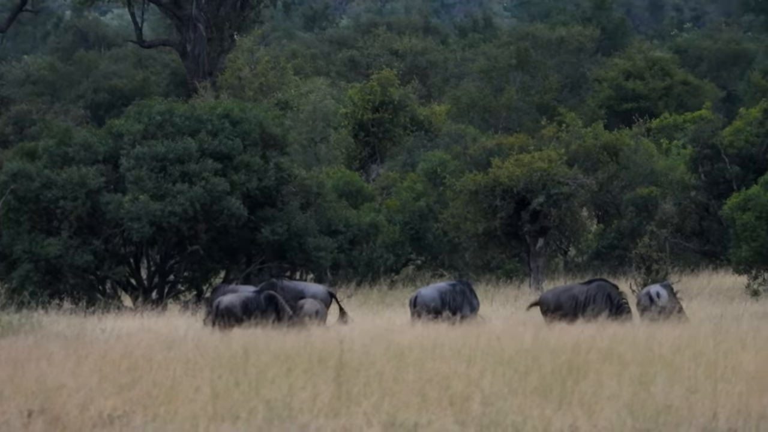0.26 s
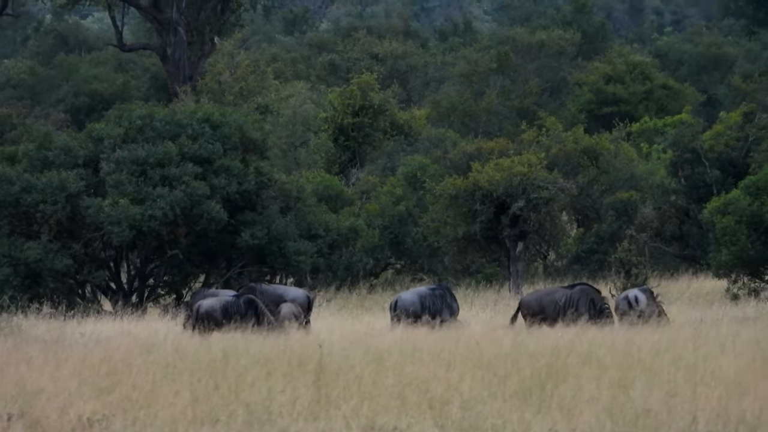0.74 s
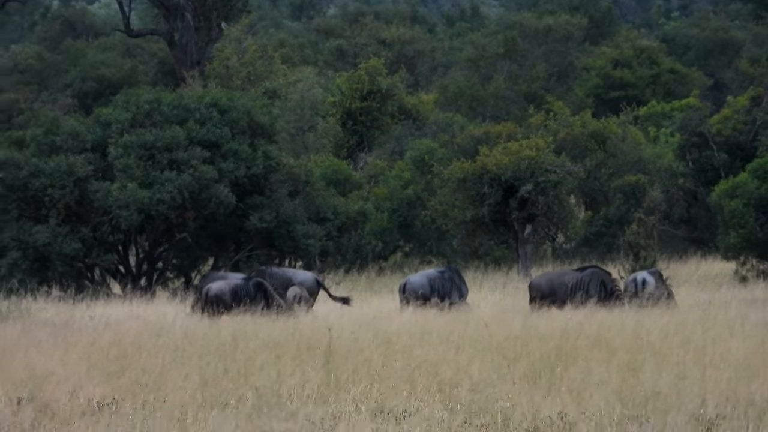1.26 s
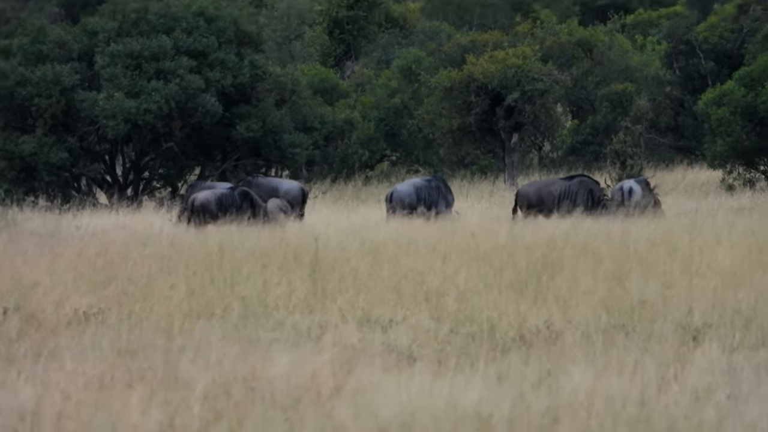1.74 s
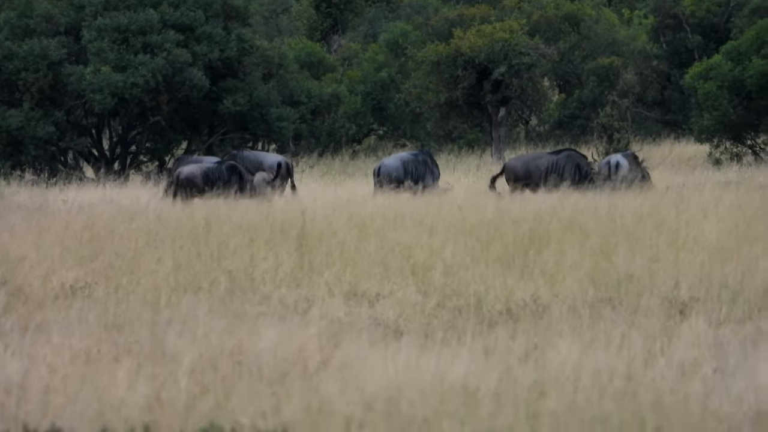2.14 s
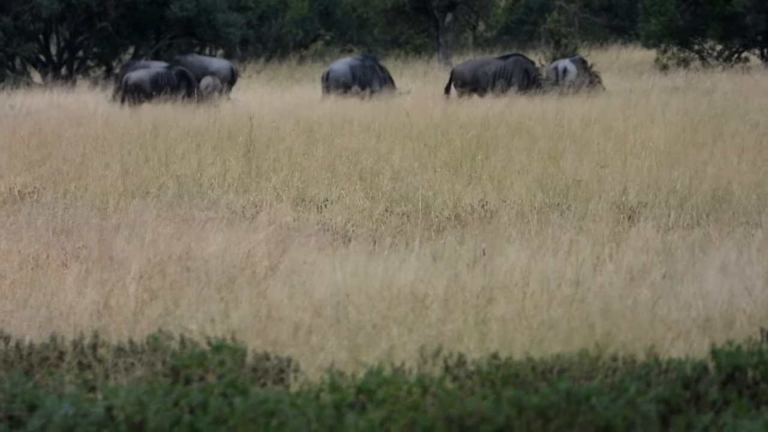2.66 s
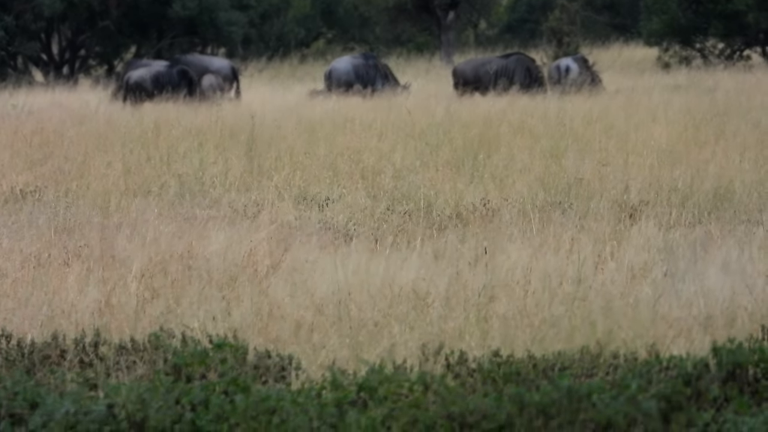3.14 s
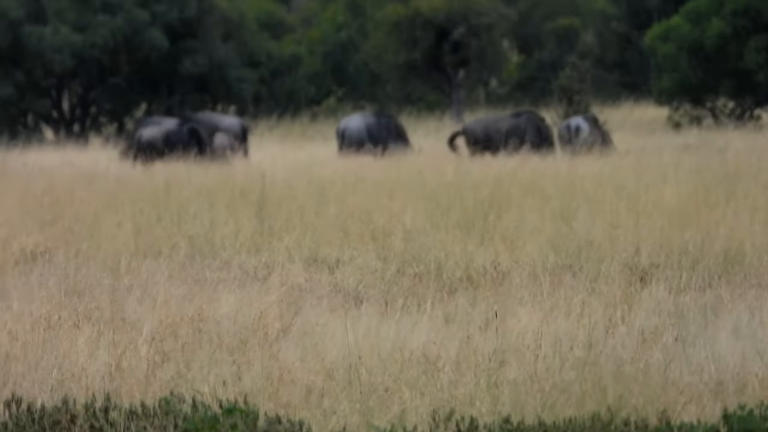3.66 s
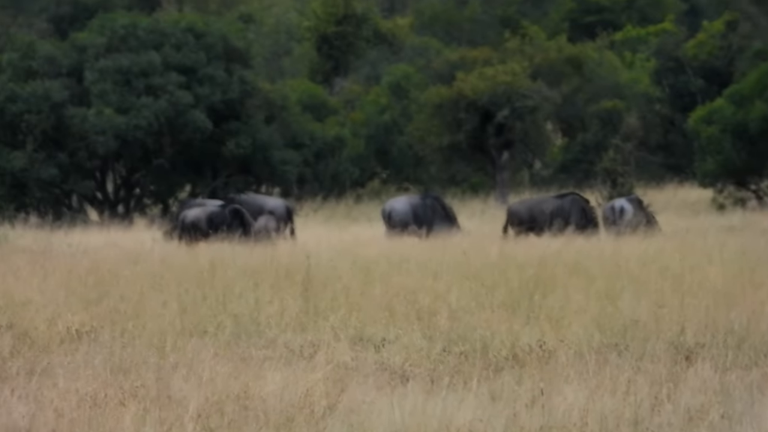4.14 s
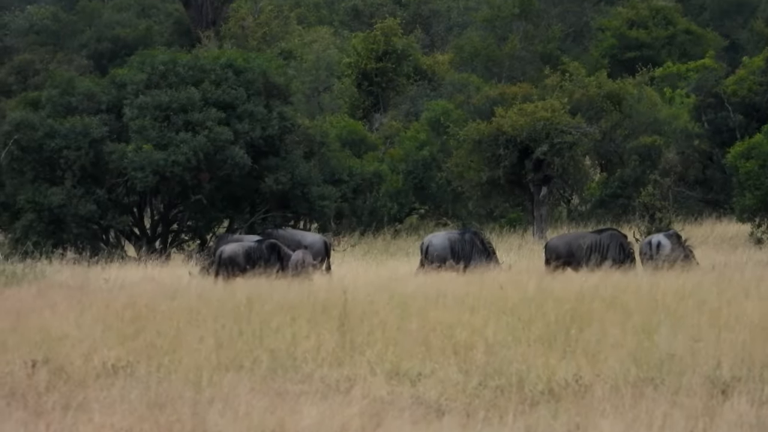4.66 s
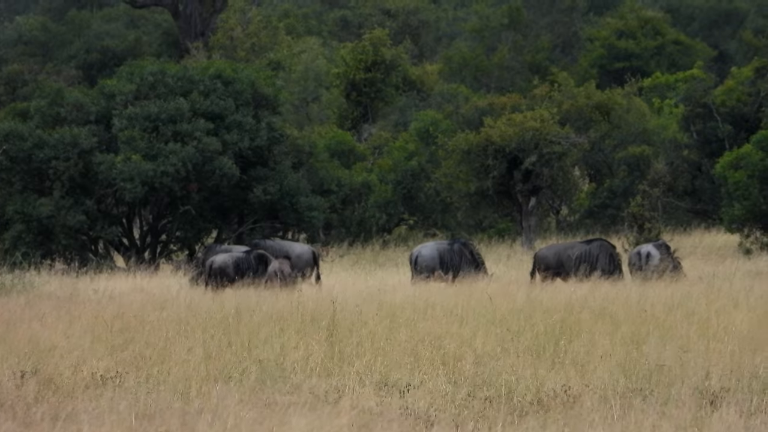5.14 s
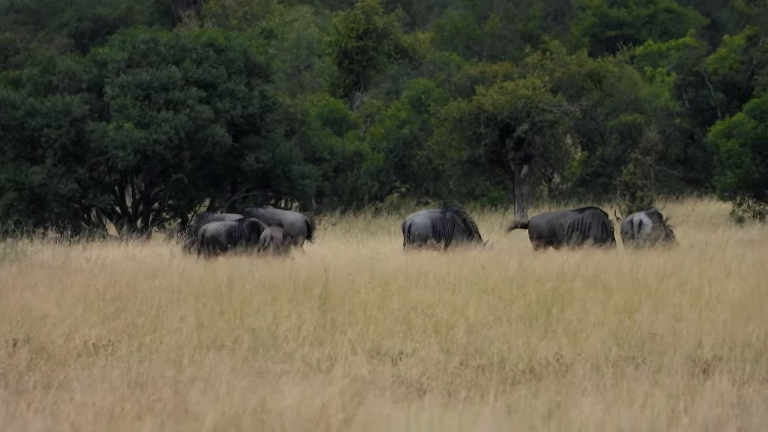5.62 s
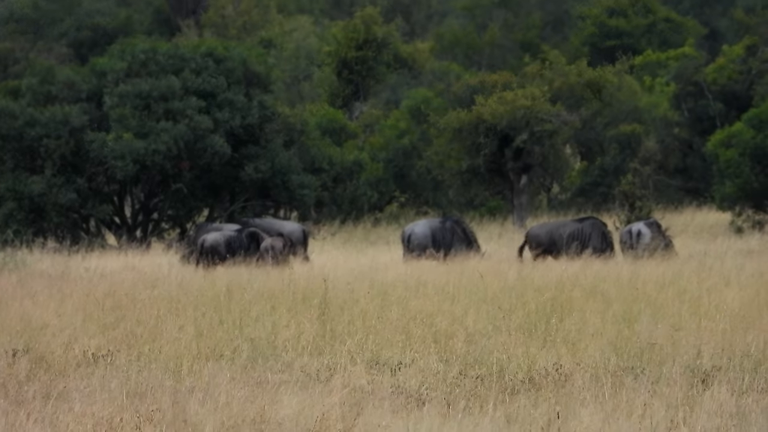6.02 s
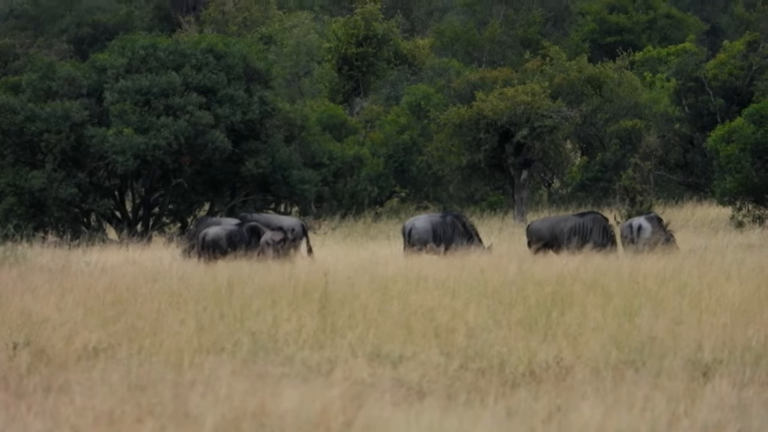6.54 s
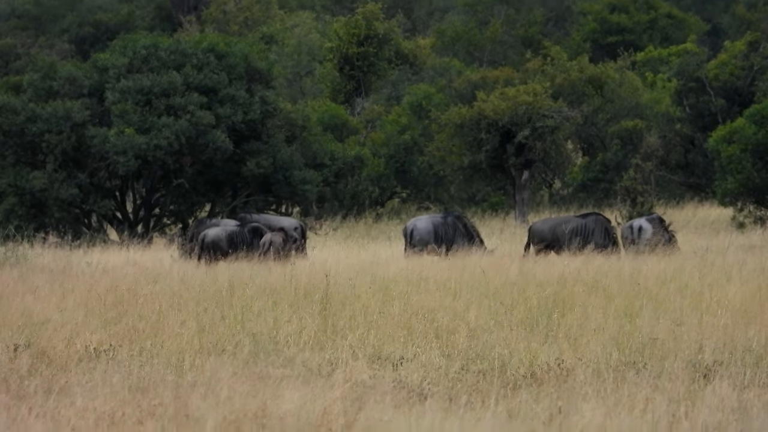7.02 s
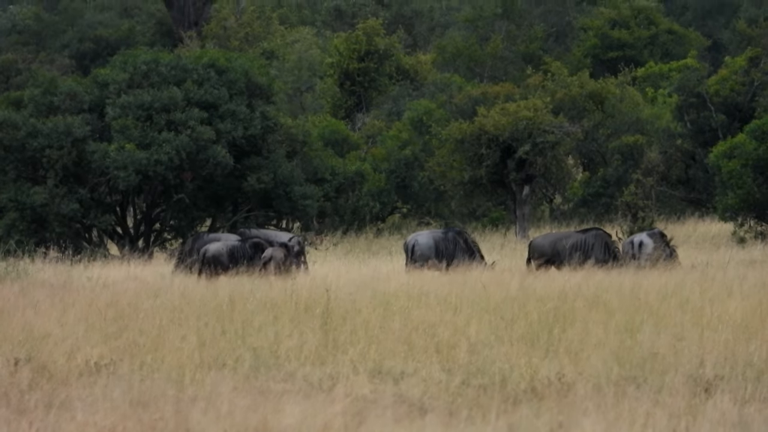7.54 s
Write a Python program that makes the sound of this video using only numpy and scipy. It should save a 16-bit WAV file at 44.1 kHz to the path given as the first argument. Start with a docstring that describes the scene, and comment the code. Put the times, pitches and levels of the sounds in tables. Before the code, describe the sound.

A spurfowl-like bird builds from soft yelps to harsh, repeated crows while a second screeches along, over small bird trills and a low distant engine hum.

```python
"""Savanna dawn chorus

A spurfowl works up from soft yelps to a harsh, repeated crow; a second screeches along, and others
answer from far off. Throat resonances shape pulses into honks and rasps; clear notes are gliding sines.
Small birds trill and chip in the bush, which scatters the calls; the tree line returns one echo.
A distant engine hums, the camera body is knocked, and a gain control ducks everything under loud crows."""
import sys
import numpy as np
from scipy import signal
from scipy.fft import rfft, irfft, next_fast_len
from scipy.io import wavfile
from scipy.ndimage import uniform_filter1d

SR = 44100
rng = np.random.default_rng(int(sys.argv[2]) if len(sys.argv) > 2 else 0)


def generate_wav(signal):
    """Clip the signal to [-1, 1] and save it as 16-bit WAV at the path in sys.argv[1]."""
    frames = np.transpose(np.atleast_2d(signal))
    scaled = np.clip(frames, -1, 1) * 32767
    pcm = np.round(scaled).astype(np.int16)
    wavfile.write(sys.argv[1], SR, pcm)


N = 343539
TIME = np.arange(N) / SR
EDGE_HZ = 15750  # upper band limit


def gain_of(db):
    """Decibels to gain."""
    return 10 ** (np.asarray(db) / 20)


def evened(x):
    """Scales to an rms of 1."""
    return x / np.sqrt(np.mean(x ** 2) + 1e-20)


def read(points, hz):
    """Joins (Hz, value) points on a log-frequency axis."""
    f, value = np.transpose(points)
    return np.interp(np.log(hz + 1), np.log(f + 1), value)


def coloured(x, points):
    """Filters by a (Hz, dB) spectrum."""
    size = next_fast_len(len(x) + 512)
    gain = gain_of(read(points, np.fft.rfftfreq(size, 1 / SR)))
    return irfft(rfft(x, size) * gain, size)[:len(x)]


def wander(rate_hz):
    """A random drift of rms 1 over the whole scene, joining rate_hz new values a second by straight lines."""
    knots = rng.standard_normal(N // 16)
    return evened(np.interp(TIME * rate_hz, np.arange(len(knots)), knots))


def resonate(x, hz, width_hz):
    """A resonance of gain 1 that follows the curve hz."""
    turn = np.exp(2j * np.pi * np.cumsum(hz) / SR)
    r = np.exp(-np.pi * width_hz / SR)
    return 2 * (turn * signal.lfilter([1 - r], [1, -r], x / turn)).real


def note(s, length, edge_s):
    """A note's samples, its progress from 0 to 1, and its soft-edged envelope."""
    # half of the edge time is added, a quarter on each side
    first = max(round((s - edge_s / 4) * SR), 0)
    last = min(round((s + length + edge_s / 4) * SR), N)
    at = np.arange(first, last)
    return at, np.linspace(0, 1, len(at)), signal.windows.tukey(len(at), min(2 * edge_s / length, 1))


def glide(s, length, first_hz, last_hz, db, overtones_db, arch=0):
    """A clear note whose middle pitch is raised by the share arch."""
    middle_hz = (first_hz + last_hz) / 2 * (1 + arch)
    return s, length, first_hz, middle_hz, last_hz, db, overtones_db


# resonances of the spurfowl's throat and open beak: (frequency [Hz], relative level [dB])
THROAT_SPECTRUM = [(700, -42), (1200, -47), (1550, -18.5), (2300, -0.5), (3050, -9.5), (3800, -15),
                   (4600, -19.5), (5350, -15.5), (6100, -21.5), (7000, -38), (10000, -37), (15000, -47)]


def overtones(turns, hz, tilt_db=0):
    """Harmonics above the fundamental, shaped by the throat; tilt_db an octave favours those near 3.7 kHz."""
    k = np.arange(2, 17)[:, None]
    db = read(THROAT_SPECTRUM, k * hz) - tilt_db * abs(np.log2(k * hz / 3700))
    lines = np.cos(2 * np.pi * (k * turns + rng.random(k.shape)))
    return evened((gain_of(db) * (k * hz < EDGE_HZ) * lines).sum(0))


def whistles(notes, flutter_db=1.9, edge_s=0.00899, arch_db=5):
    """Near-sine notes that swell and fade as they glide, with faint overtones."""
    waver = .007
    out, drift, flutter = np.zeros(N), wander(500), wander(300)
    for s, length, first_hz, middle_hz, last_hz, db, overtones_db in notes:
        at, u, envelope = note(s, length, edge_s)
        bow = np.polyfit([0, .5, 1], [first_hz, middle_hz, last_hz], 2)
        hz = np.polyval(bow, u) * (1 + waver * drift[at])
        turns = np.cumsum(hz) / SR
        tone = np.sqrt(2) * np.sin(2 * np.pi * turns) + gain_of(overtones_db) * overtones(turns, hz)
        swell_db = arch_db * (1 / 3 - (2 * u - 1) ** 2) + flutter_db * flutter[at]
        out[at] += gain_of(db + swell_db) * envelope * tone
    return out


# source spectrum of the noise and chaotic pulses: (frequency [Hz], relative level [dB])
RASP_SPECTRUM = [(400, -34), (1000, -5), (1800, -0.5), (2700, 4.5), (3800, 9.5), (4600, -1.5), (5700, -2),
                 (7100, -22), (9500, -44), (15000, -37)]


def honks(notes, waver=0.0063, rasp_db=-19, edge_s=.007, bend=0.037, bend_s=0.0051, level_db=-1.0):
    """Regular pulses ring the throat: a stack of lines over a little rasp.

    Notes above 1 kHz slide down into pitch, lower ones up."""
    out, drift = np.zeros(N), wander(600)
    rasp = evened(coloured(rng.standard_normal(N), RASP_SPECTRUM))
    for s, length, first_hz, last_hz, db, tilt_db in notes:
        at, u, envelope = note(s, length, edge_s)
        slide = bend * np.sign(first_hz - 1000) * np.exp(-u * length / bend_s)
        hz = (first_hz + (last_hz - first_hz) * u) * (1 + slide + waver * drift[at])
        stack = overtones(np.cumsum(hz) / SR, hz, tilt_db)
        out[at] += gain_of(level_db + db) * envelope * (stack + gain_of(rasp_db) * rasp[at])
    return out


def rasps(notes, pulse_hz=770, relative_width=0.39, wobble=0.037, steadiness=1.0, edge_s=0.023,
          level_db=5.5, hiss_db=-22):
    """Irregular pulses ring a moving throat resonance; the membranes' limited swing evens out the level."""
    turns = np.cumsum(pulse_hz * np.exp(.1 * wander(1200) + .07 * wander(150))) / SR
    uneven, throb_db, arch_db = .45, 1.0, 2.5
    strength = 1 + uneven * wander(1500)
    clicks = np.diff(np.floor(turns), prepend=0)  # one per completed turn
    pulses = evened(coloured(clicks * strength, RASP_SPECTRUM))
    for poles in ([1, -1.5, .64], [1, -1.3, .72], [1, -1.22, .76]):
        pulses = signal.lfilter(poles[::-1], poles, pulses)  # the windpipe spreads each pulse in time
    hiss_spectrum = [(300, -3.5), (5000, 4.5), (10000, -1), (15000, -19)]
    hiss = evened(coloured(rng.standard_normal(N), hiss_spectrum))
    out, throb, lurch = np.zeros(N), wander(140), wander(220)
    buzz_hz, buzz_swing, buzz_db = 265, .06, 1.5
    # a slower flapping of the membranes
    buzz = np.sin(2 * np.pi * np.cumsum(buzz_hz * (1 + .12 * wander(60))) / SR)
    for s, length, first_hz, last_hz, db, swell_db, broad_db in notes:
        at, u, envelope = note(s, length, edge_s)
        hz = (first_hz + (last_hz - first_hz) * u) * (1 + wobble * lurch[at] + buzz_swing * buzz[at])
        width_hz = relative_width * hz.mean()
        ring = resonate(resonate(pulses[at], hz, width_hz), hz, width_hz)
        voice = evened(ring) + gain_of(broad_db) * envelope * pulses[at]  # brightest at full pressure
        swing = uniform_filter1d(voice ** 2, size=70) + 0.00079
        voice = evened(voice / swing ** (min(steadiness, 1) / 2))
        voice += gain_of(hiss_db) * (hz / 3400) ** 3 * envelope * hiss[at]  # a tight, high syrinx hisses
        effort_db = level_db + db + swell_db * (u - .5) - arch_db * (2 * u - 1) ** 2
        effort_db += throb_db * throb[at] + buzz_db * buzz[at]
        out[at] += gain_of(effort_db) * envelope * voice
    return out


# distant engine: (multiple of its firing rate [ratio], mean level [dB])
ENGINE_ORDERS = [(1, -50), (2, -38), (3, -36.5), (3.5, -42.5), (11.76, -54)]
FIRING_HZ = 51.62  # mean rate


def engine(waver=0.00676, fading_db=0.5):
    """Mostly low orders of a far engine, each fading in and out on its way through the air."""
    turns = np.cumsum(FIRING_HZ * (1 + waver * wander(4.4))) / SR
    hum = np.zeros(N)
    for k, db in ENGINE_ORDERS:
        level = gain_of(db + fading_db * wander(5.5))
        hum += level * np.sqrt(2) * np.sin(2 * np.pi * (k * turns + rng.random()))
    return hum


# far rumble and still air: (frequency [Hz], relative density [dB per Hz])
AIR_SPECTRUM = [(20, -21), (40, -17.5), (72, 2), (120, -1), (185, -5), (215, -9.5), (330, -18.5),
                (700, -17.5), (880, -9.5), (1400, -16), (3000, -23), (4400, -26), (5100, -28),
                (7500, -36.5), (15500, -38)]
# stereo width of the air: (frequency [Hz], left-right likeness [0 to 1])
AIR_LIKENESS = [(100, 1), (500, 0.98), (2000, .97), (4500, 0.76), (8000, 0.96), (15000, 0.3)]
AIR_DB = -31  # mean level


def air(patchy_db=3.0):
    """Rumble, a patchy wash of far-off birds, and smooth hiss on top, all from shaped stereo noise."""
    frames, hz = N // 512 + 5, np.fft.rfftfreq(2048, 1 / SR)
    a, b, c, d, patches = rng.standard_normal((frames, len(hz), 5)).T
    patches = evened(uniform_filter1d(uniform_filter1d(patches, size=14, axis=0), size=4, axis=1))
    birds = read([(400, 0), (850, 1), (4500, 1), (7500, 0)], hz)[:, None]  # share of patchiness
    same = np.clip(read(AIR_LIKENESS, hz), -1, 1)[:, None]
    left = a + 1j * b
    right = same * left + np.sqrt(1 - same ** 2) * (c + 1j * d)
    shape = gain_of(read(AIR_SPECTRUM, hz)[:, None] + patchy_db * birds * patches)
    noise = signal.istft(np.array([left, right]) * shape, nperseg=2048, noverlap=1536)[1][:, :N]
    swell_db = .4
    return gain_of(AIR_DB + swell_db * wander(3)) * evened(noise)


# trills: (start [s], step down [s], end [s], relative level [dB])
TRILL_BOUTS = [(-.3, 0.203, 1.03, -47), (1.08, 1.85, 2.7, -46.5), (2.557, 3.105, 4.9, -46.5),
               (4.5, 4.801, 5.24, -47.5), (5.66, 6.166, 6.8, -47), (6.97, 7.418, 8.6, -50)]
# trill before its step: (sweep rate [per s], base pitch [Hz], relative level [dB])
TRILL_BEFORE = (66, 6770, -5)
# trill after its step: (sweep rate [per s], base pitch [Hz], relative level [dB])
TRILL_AFTER = (56, 6330, 0)
TRILL_STEP_S, TRILL_FADE_S = .05, .08


def trill(fall=0.192, low_voice=.71, low_db=-4, uneven_db=2):
    """The two sides of the syrinx take turns with quick downward sweeps, first high and fast, then lower."""
    stepped, loudness = np.zeros(N), np.zeros(N)
    for start, step, end, db in TRILL_BOUTS:
        at, _, envelope = note(start, end - start, TRILL_FADE_S)
        stepped[at] = (1 + np.tanh((TIME[at] - step) / TRILL_STEP_S)) / 2
        loudness[at] += gain_of(db) * envelope
    rate, hz, db = (high + (low - high) * stepped for high, low in zip(TRILL_BEFORE, TRILL_AFTER))
    cycles, out = np.cumsum(rate) / SR, np.zeros(N)
    for lag, ratio, side_db in [(0, 0.98, 0), (.5, low_voice, low_db)]:
        u = (cycles + lag) % 1
        pitch = ratio * hz * (1 + fall * (.5 - u) + 0.0068 * wander(70))
        sweeps = np.sin(np.pi * u) ** 2 * np.sin(2 * np.pi * np.cumsum(pitch) / SR)
        out += gain_of(db + side_db + uneven_db * wander(50)) * evened(sweeps)
    return loudness * out


# warm-up yelps: (time [s], length [s], base pitch [Hz], level [dB])
WARM_UP_YELPS = [(-.012, 0.055, 1510, -27), (0.685, .058, 1538, -22.5), (1.298, 0.055, 1662, -17),
                 (1.69, 0.055, 1743, -13.5)]
CRACK_RISE, CRACK_DROP = 1.08, 0.705  # ratios to the base pitch
CRACK_JUMP_HZ, CRACK_DB = 2230, -4.5  # start of the high part, and its level against the rest


def cracked_yelps():
    """The voice rises, jumps to a thin high register, and drops back to fall away."""
    notes = []
    for s, length, hz, db in WARM_UP_YELPS:
        rise = glide(s, 0.37 * length, .94 * hz, CRACK_RISE * hz, db, -21)
        high = glide(s + .27 * length, 0.46 * length, CRACK_JUMP_HZ, 1704, db + CRACK_DB, -13.5, arch=0.08)
        drop = glide(s + 0.67 * length, 0.364 * length, 0.98 * hz, CRACK_DROP * hz, db, -17.5, arch=-0.033)
        notes += [rise, high, drop]
    return whistles(notes)


# the bush's reverberation: (frequency [Hz], decay by 60 dB [s])
BUSH_DECAY = [(500, 1), (2400, 0.77), (5000, 0.85), (10000, 0.1)]


def bush(x, scatter_db=-16, echo_s=0.1, echo_db=-19, build_s=0.0028, apart=0.15):
    """Trunks and leaves scatter a thin tail; the tree line returns one clear echo."""
    taps = rng.standard_normal((2, SR)) * (rng.random(SR) < 3000 / SR)
    stereo_taps = taps[0] + apart * np.array([[1], [-1]]) * taps[1]
    hz, t, z = signal.stft(stereo_taps, SR, nperseg=256)
    decay = gain_of(-60 * t / read(BUSH_DECAY, hz)[:, None]) * (1 - np.exp(-t / build_s))
    tail = signal.istft(z * decay, SR, nperseg=256)[1]
    tail = gain_of(scatter_db) * tail / np.linalg.norm(tail[0])
    tail[:, round(echo_s * SR)] += gain_of(echo_db)
    return signal.fftconvolve(x[None], tail, axes=1)[:, :N]


# soft warbles: (time [s], length [s], start [Hz], middle [Hz], end [Hz], level [dB])
WARBLED_NOTES = [(.1, .082, 2600, 2920, 3340, -43.5), (6.305, 0.0576, 3730, 4170, 3780, -42.5),
                 (6.308, 0.055, 1690, 2082, 1730, -44), (6.369, 0.084, 1990, 1680, 1650, -35.5),
                 (6.376, 0.1, 3250, 2890, 3260, -39.5), (6.436, 0.047, 1770, 2500, 3000, -38),
                 (6.485, .029, 2870, 2750, 2800, -35), (6.908, 0.042, 2600, 2470, 2340, -35.5),
                 (7.227, .032, 1733, 1636, 2080, -34), (7.258, 0.054, 2100, 1587, 1360, -35),
                 (7.305, 0.036, 2130, 1920, 1870, -33), (7.27, .036, 3470, 2980, 2560, -38.5)]
# thin arched peeps: (time [s], length [s])
PEEP_TIMES = [(0.244, 0.019), (.518, 0.048), (.792, .062), (1.423, 0.041)]
PEEP_HZ, PEEP_DB = 3580, -42  # pitch at both ends
# low far hoots: (time [s])
HOOT_TIMES = [1.04, 3.648, 4.972]
HOOT_S, HOOT_HZ, HOOT_DB = 0.058, 870, -34.5  # pitch at both ends
# a small bird's chatter: (time [s], pitch of the chirp's tail [Hz], relative level [dB])
CHATTER_NOTES = [(6.613, 2640, -31.5), (6.664, 2296, -33), (6.722, 1764, -33), (6.778, 2220, -30),
                 (6.858, 2700, -30)]
BURR_S, BURR_HZ, CHIRP_TOP_HZ = 0.037, 3200, 4630


def small_birds(chirp_db=-1, tail_db=-5, chirp_s=0.0104):
    """Sines warble, peep and hoot; chatter joins a steep chirp, a pulsed burr and a whistled tail."""
    notes, burrs = [(*row, -20) for row in WARBLED_NOTES], []
    for s, tail_hz, db in CHATTER_NOTES:
        burrs.append((s, BURR_S, BURR_HZ, BURR_HZ, db, -4, 0))
        notes.append(glide(s + 0.0017, chirp_s, CHIRP_TOP_HZ, tail_hz, db + chirp_db, -29))
        notes.append(glide(s + 0.016, 0.0292, tail_hz, tail_hz, db + tail_db, -24, arch=0.042))
    notes += [glide(s, length, PEEP_HZ, PEEP_HZ, PEEP_DB, -30, arch=0.0414) for s, length in PEEP_TIMES]
    notes += [glide(s, HOOT_S, HOOT_HZ, HOOT_HZ, HOOT_DB, -30, arch=0.032) for s in HOOT_TIMES]
    return whistles(notes, edge_s=0.00588) + rasps(burrs, level_db=0.5, edge_s=.009)


# A crow is yelp, gargle, bray; later yelps fall less and mostly grow hoarser as the bird warms up:
# (time [s], length [s], start [Hz], end [Hz], clear level [dB], hoarseness against that level [dB])
CROW_YELPS = [(0.167, 0.047, 1610, 990, -30.5, -9), (0.851, 0.04, 1667, 1143, -15.5, -20),
              (2.34, .047, 1840, 1565, -9.5, -11), (2.988, 0.044, 1900, 1540, -8, -13.5),
              (3.676, 0.05, 1960, 1692, -9, -10), (4.374, .052, 1980, 1755, -9, -7.5),
              (5.089, 0.052, 1886, 1846, -12, -2)]
# at 0 dB of hoarseness the rasp leads the yelp; each dB less delays it
FRAY_LEAD_S, FRAY_DELAY_S, FRAY_LINGER_S = .012, .0021, 0.033


def yelps(overtones_db=-19, fade_db=-4, sag=0.93, scoop_s=.019, scoop_db=-11):
    """A reedy scoop, then a clear falling note that frays into a rasp."""
    clear, hoarse = [], []
    for s, length, first_hz, last_hz, db, hoarse_db in CROW_YELPS:
        rasp_db = db + hoarse_db
        clear.append(glide(s - scoop_s, 1.2 * scoop_s, .6 * first_hz, .82 * first_hz, rasp_db + scoop_db, -2.5))
        clear.append(glide(s, length, first_hz, last_hz, db, overtones_db, arch=0.0198))
        frays = s - FRAY_LEAD_S - FRAY_DELAY_S * hoarse_db
        fray_s = s + length + FRAY_LINGER_S - frays
        hoarse.append((frays, fray_s, 1.036 * first_hz, sag * last_hz, rasp_db, fade_db, -8))
    return whistles(clear, arch_db=6.5, edge_s=0.00688) + rasps(hoarse)


# single thin falling chips: (time [s])
SINGLE_CHIPS = [.195, 1.512, 3.283, 3.449, 7.077]
# bouts of paired chips: (first pair [s], end [s])
PAIRED_CHIPS = [(.307, 1), (1.281, 1.4), (7.178, 7.7)]
CHIP_GAP_S, CHIP_PERIOD_S = .069, .2  # within a pair, and from pair to pair
# runs of soft pips: (first [s], end [s], gap [s], middle pitch [Hz], level [dB])
PIPS = [(0.351, 1.26, 0.065, 2300, -38), (6.995, 7.37, .0588, 2496, -36.5)]


def chips(chip_db=-42, top_hz=6000, bottom_hz=5250, chip_s=0.0193, pip_s=0.0115, pip_fall=0.16):
    """Short falling sines of two small birds: thin chips and runs of lower pips."""
    times = list(SINGLE_CHIPS)
    for first, end in PAIRED_CHIPS:
        for s in np.arange(first, end, CHIP_PERIOD_S):
            times += [s, s + CHIP_GAP_S]
    glides = [(s, chip_s, top_hz, bottom_hz, chip_db) for s in times]
    for first, end, gap, hz, db in PIPS:
        high_hz, low_hz = hz * (1 + pip_fall / 2), hz * (1 - pip_fall / 2)
        glides += [(s, pip_s, high_hz, low_hz, db) for s in np.arange(first, end, gap)]
    out = np.zeros(N)
    for s, length, first_hz, last_hz, db in glides:
        at, u, envelope = note(s, length, edge_s=.008)
        turns = np.cumsum(first_hz + (last_hz - first_hz) * u) / SR
        out[at] += gain_of(db) * envelope * np.sqrt(2) * np.sin(2 * np.pi * turns)
    return out


# gargles: (time [s], middle of the throat resonance [Hz], relative level [dB])
CROW_GARGLES = [(0.741, 1430, -40), (.895, 1360, -41), (1.352, 1500, -29.5), (1.747, 1570, -19.5),
                (2.405, 1810, -14.5), (3.057, 1810, -18.5), (3.751, 2070, -13), (4.456, 2200, -10.5),
                (5.172, 2100, -13)]
GARGLE_S, GARGLE_CLIMB = 0.063, .15  # climb: share below and above the middle


def gargles(swell_db=3, broad_db=-8):
    """The throat resonance climbs through a short rasp."""
    notes = []
    for s, hz, db in CROW_GARGLES:
        low_hz, high_hz = hz * (1 - GARGLE_CLIMB), hz * (1 + GARGLE_CLIMB)
        notes.append((s, GARGLE_S, low_hz, high_hz, db, swell_db, broad_db))
    return rasps(notes)


# second spurfowl's screeches:
# (time [s], length [s], relative level [dB], swell over the note [dB], broad rasp [dB])
SECOND_SCREECHES = [(0.903, 0.041, -40.5, -3, -12), (1.09, 0.06, -36, 16, 1), (1.552, 0.064, -31, 7, 1),
                    (2.008, 0.083, -28.5, -7, 0), (2.441, 0.095, -20.5, 4, 0),
                    (2.989, 0.13, -19.5, -8, 4.5), (3.598, 0.156, -19, -0.5, -0.5),
                    (4.316, 0.15, -18, 0.5, 2.5), (4.903, 0.043, -36, 6, 1)]
# throat resonance of a screech: (start [Hz], end [Hz])
SCREECH_SLIDE = (3320, 2920)
# its nasal squeals:
# (time [s], length [s], start [Hz], end [Hz], relative level [dB], lead-in whistle level [dB])
NASAL_SQUEALS = [(2.958, 0.039, 1213, 1050, -20, -24), (3.535, 0.04, 1268, 1190, -18.5, -21.5),
                 (3.589, 0.022, 1205, 1210, -20.5, -28), (4.245, 0.039, 1250, 1240, -18, -19.5),
                 (4.308, 0.036, 1220, 1023, -24, -24.5)]
# lead-in whistle: (start [Hz], end [Hz])
LEAD_SLIDE = (2790, 2504)
LEAD_S = .023  # how early the whistle starts


def screeches():
    """The second spurfowl: whistles slip into nasal pulsed squeals, among hissing, rasped screeches."""
    leads, nasal = [], []
    for s, length, first_hz, last_hz, db, lead_db in NASAL_SQUEALS:
        leads.append(glide(s - LEAD_S, 0.0388, *LEAD_SLIDE, lead_db, -14, arch=0.0227))
        nasal.append((s, length, first_hz, last_hz, db, 22))
    harsh = [(s, length, *SCREECH_SLIDE, db, swell_db, broad_db)
             for s, length, db, swell_db, broad_db in SECOND_SCREECHES]
    return whistles(leads) + honks(nasal) + rasps(harsh, pulse_hz=797, relative_width=0.36, hiss_db=-15.5)


# knocks on the camera body: (time [s], relative level [dB], brightness [dB an octave])
KNOCKS = [(1.42, -10.5, -7), (1.4957, -16, 1), (1.53, -16, -13), (1.589, -23, -10), (2.362, -26, 3.5)]
# the camera body's modes: (frequency [Hz], decay by 60 dB [s], relative level [dB])
BODY_MODES = [(42.8, 0.18, -27), (99.4, .16, 1.5), (311, 0.067, -2), (520, 0.053, -6.5), (925, 0.025, 3.5),
              (1885, 0.02, 9.5)]


def bumps(rise_s=0.0024, creak_db=-13):
    """Each knock rings the body's damped modes, tilted by its own brightness, with a dull creak."""
    creak_spectrum = [(100, 2), (600, -17.5), (2000, -13.5), (8000, -44)]
    out, creak = np.zeros(N), evened(coloured(rng.standard_normal(N), creak_spectrum))
    for s, db, bright_db in KNOCKS:
        for hz, t60, mode_db in BODY_MODES:
            at = np.arange(round(s * SR), round((s + t60) * SR))
            t = (at - at[0]) / SR
            ring_db = db + mode_db + bright_db * np.log2(hz / 100) - 60 * t / t60
            ring = np.sin(2 * np.pi * hz * t) + gain_of(creak_db) * creak[at]
            out[at] += gain_of(ring_db) * (1 - np.exp(-t / rise_s)) * ring
    return out


# brays, a honk that breaks into a rasp and ends on a catch: (time [s], length [s], honk length [s],
# throat resonance [Hz], relative honk level [dB], relative rasp level [dB], relative catch level [dB])
CROW_BRAYS = [(1.854, 0.1, 0.01, 1980, -11, -9.5, -22.5), (2.511, 0.1, 0.029, 2200, -6.5, -9.5, -14.5),
              (3.166, 0.11, 0.019, 2134, -9.5, -9, -16.5), (3.855, 0.12, 0.047, 2340, -2.5, -9, -11.5),
              (4.558, 0.13, 0.042, 2440, -5.5, -10, -12), (5.278, 0.13, 0.0014, 2290, 0.5, -7, -10),
              (5.479, 0.1, 0.0014, 2220, -11, -12, -15)]
HONK_LAG_S, HONK_HZ, HONK_RISE, CATCH_S = 0.012, 766.4, 1.02, 0.072  # rise: ratio of end to start pitch


def brays(sag=0.091, fade_db=-4, broad_db=-3, scoop_db=-4, breaks_at=0.76, overlap_s=0.024):
    """The voice scoops up into a honk, breaks into a sagging rasp and closes with one more push."""
    scoops, held, harsh = [], [], []
    for s, length, honk_s, hz, honk_db, db, catch_db in CROW_BRAYS:
        scoops.append(glide(s + 0.0033, 0.0165, 1880, 2153, db + scoop_db, -12))
        held.append((s + HONK_LAG_S, honk_s, HONK_HZ, HONK_HZ * HONK_RISE, honk_db, 5))
        breaks = s + 0.0045 + breaks_at * honk_s
        catch = s + length - CATCH_S
        rasp_s, low_hz = catch + overlap_s - breaks, hz * (1 - sag)
        harsh.append((breaks, rasp_s, hz * (1 + sag), low_hz, db, fade_db, broad_db))
        harsh.append((catch, CATCH_S, hz, low_hz, catch_db, -1, -4))
    rasp = rasps(harsh, pulse_hz=768.4, relative_width=0.35, hiss_db=-17.5)
    return whistles(scoops) + honks(held) + rasp


# far spurfowl answer: (time [s], length [s], relative level [dB])
FAR_ANSWERS = [(7.372, 0.15, -41.5), (7.504, .16, -36), (7.743, 0.29, -37.5)]
ANSWER_HZ = 2150  # middle of the throat resonance


def answers():
    """Far crows, blurred into swelling rasps."""
    return rasps([(s, length, ANSWER_HZ, ANSWER_HZ, db, 3, -3) for s, length, db in FAR_ANSWERS])


def scene(lead_us=24, trill_scatter_db=-8, trill_db=-1):
    """Birds and their echoes over the background; all reaches the left microphone a moment sooner."""
    birds = cracked_yelps() + small_birds() + yelps() + chips()
    birds += gargles() + screeches() + brays() + answers()
    hidden = gain_of(trill_db) * trill()  # deep in the leaves, so more blurred
    calls = birds + bush(birds) + hidden + bush(hidden, scatter_db=trill_scatter_db)
    left, right = calls + engine() + bumps() + air()
    size = next_fast_len(N + 64)
    delay = np.exp(-2j * np.pi * np.fft.rfftfreq(size, 1 / SR) * lead_us / 1e6)
    return np.array([left, irfft(rfft(right, size) * delay, size)[:N]])


def record(dry, ceiling_db=-7.5, recovery_db=13):
    """Gain control clamps loud crows and recovers slowly (dB a second); peaks round off, then a band limit."""
    power = abs(uniform_filter1d((dry ** 2).mean(0), size=200))
    power_db = 10 * np.log10(power + 1e-12)
    fall = TIME * recovery_db
    held_db = np.maximum.accumulate(power_db + fall) - fall  # peak level, sinking steadily
    over_db = np.maximum(held_db - ceiling_db, 0)
    ducked = dry / gain_of(uniform_filter1d(over_db, size=150))
    rounded = ducked / (1 + ducked ** 8) ** (1 / 8)
    lowpass = signal.firwin(511, EDGE_HZ, window=("kaiser", 9), fs=SR)
    return signal.oaconvolve(rounded, lowpass[None], "same")


dry = scene()
out = record(dry)
generate_wav(out)
```